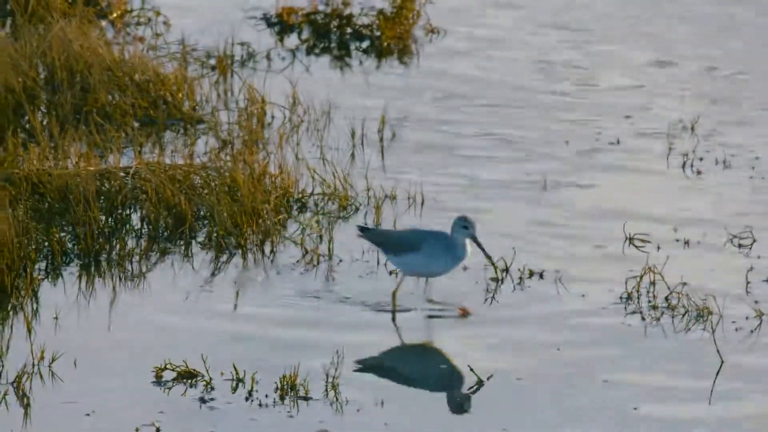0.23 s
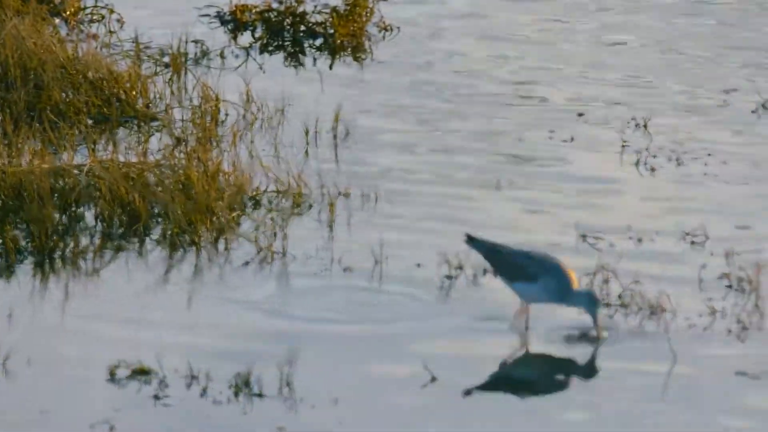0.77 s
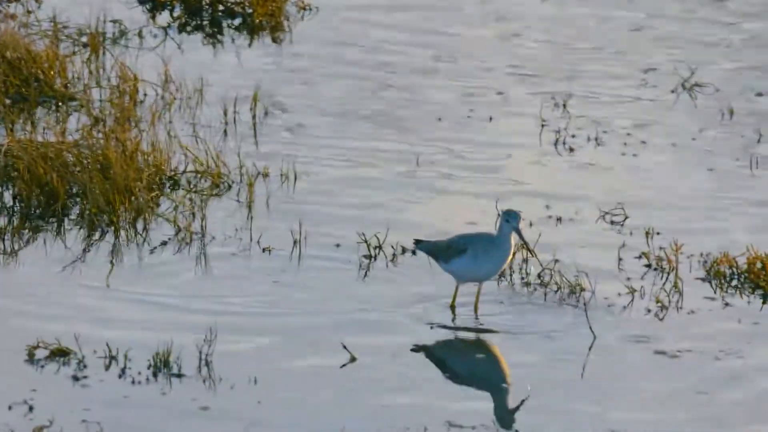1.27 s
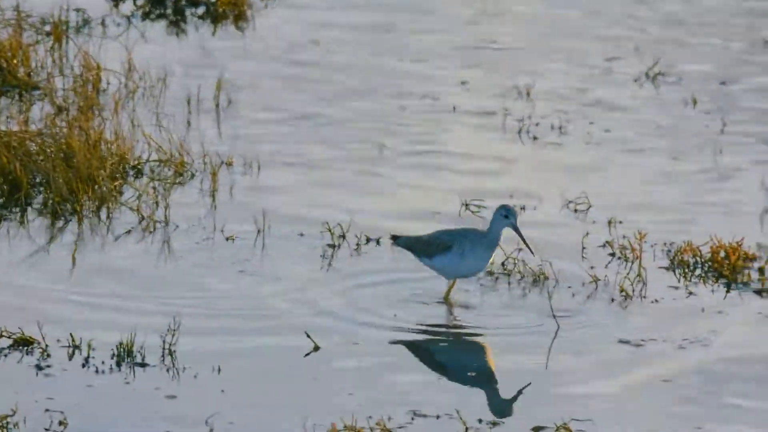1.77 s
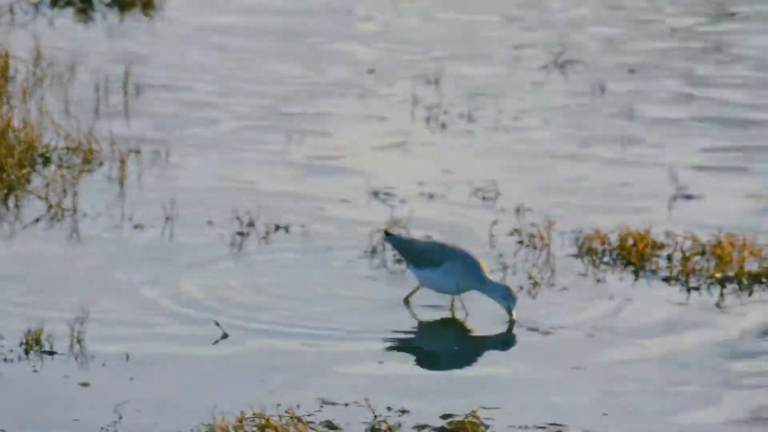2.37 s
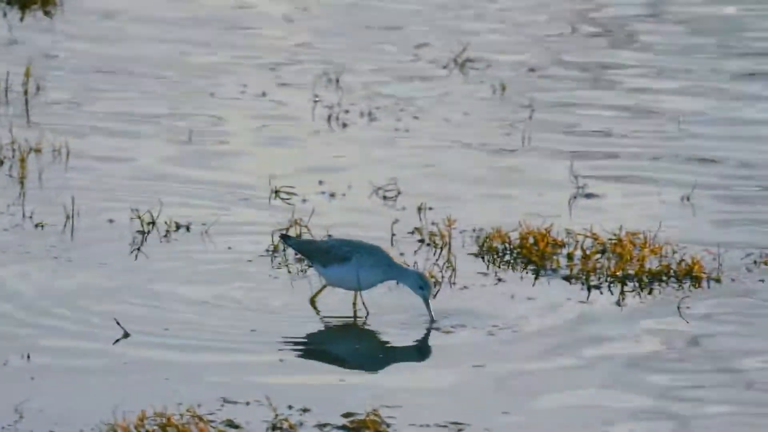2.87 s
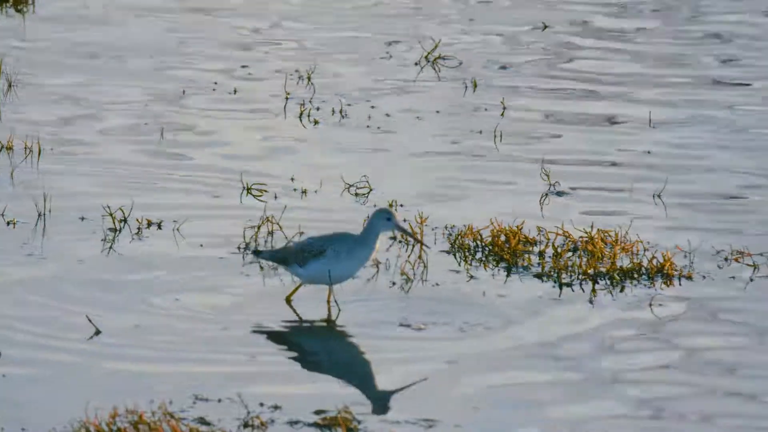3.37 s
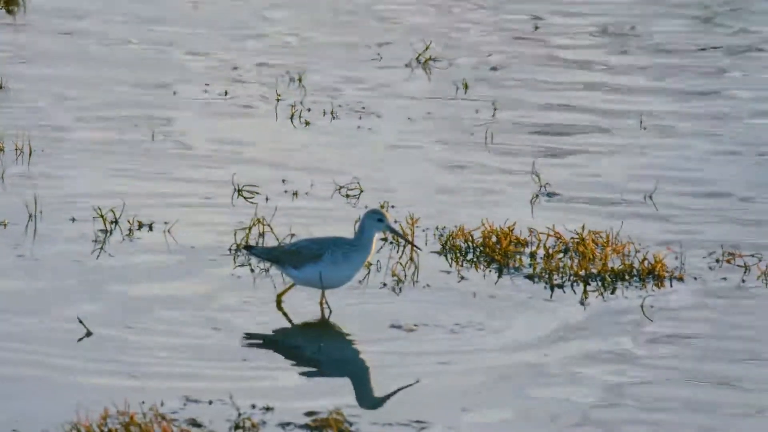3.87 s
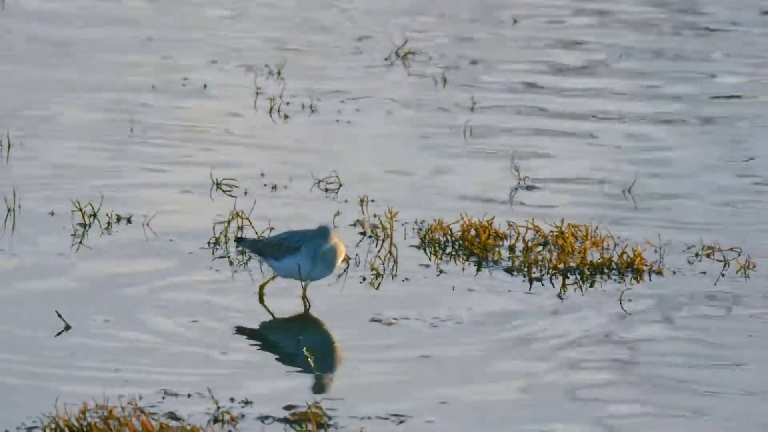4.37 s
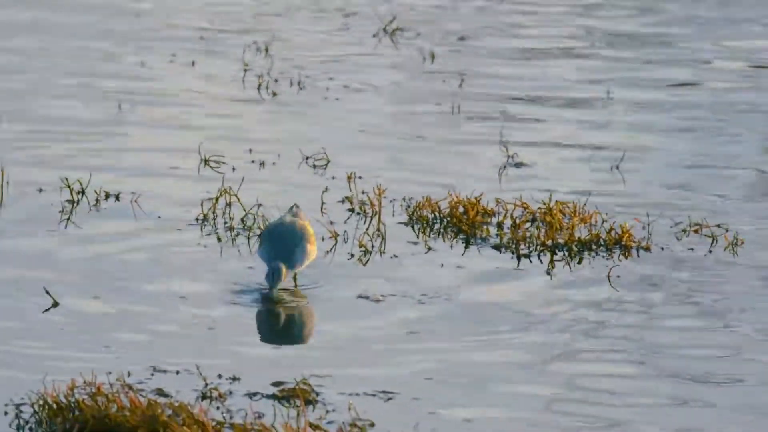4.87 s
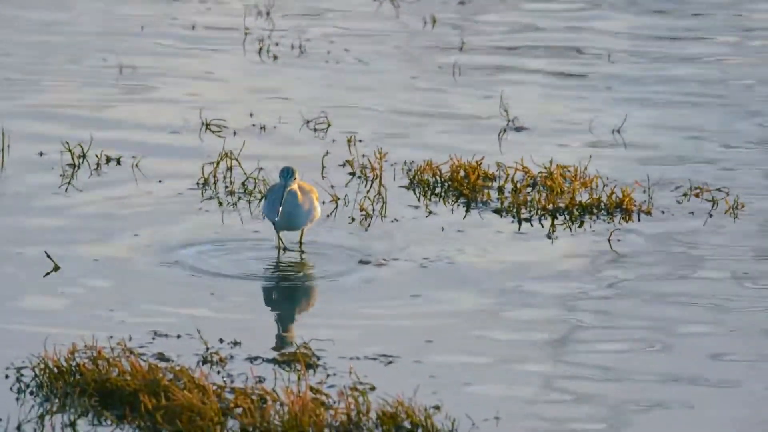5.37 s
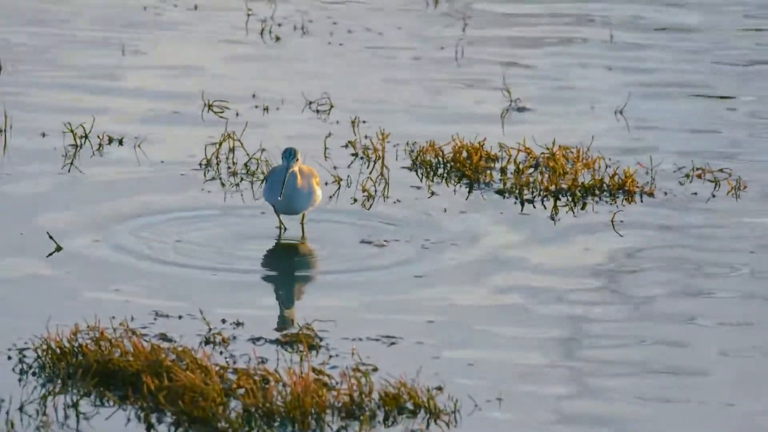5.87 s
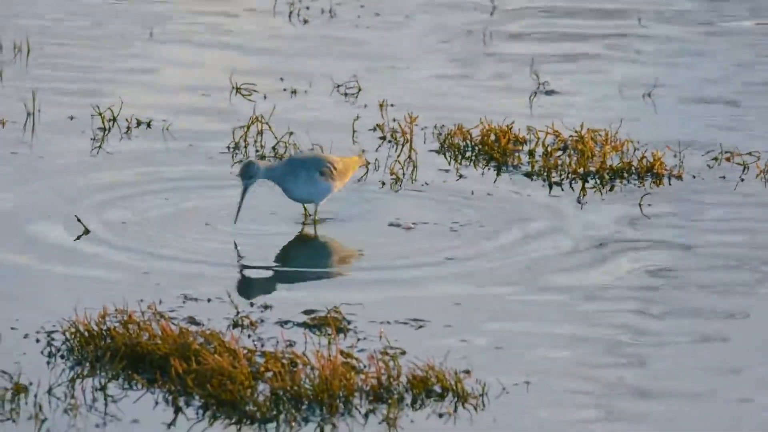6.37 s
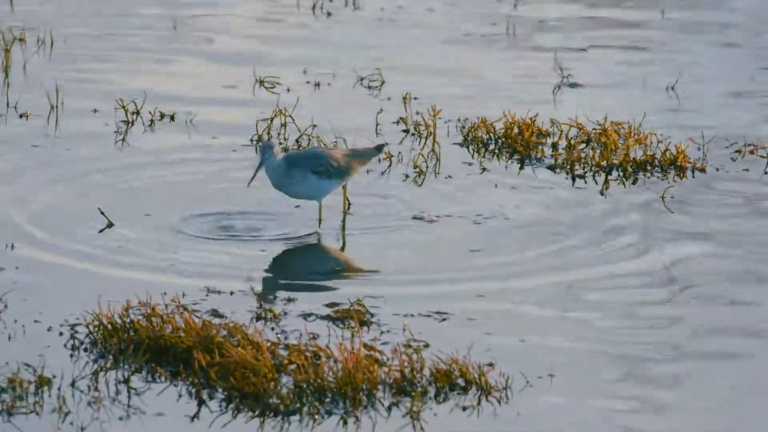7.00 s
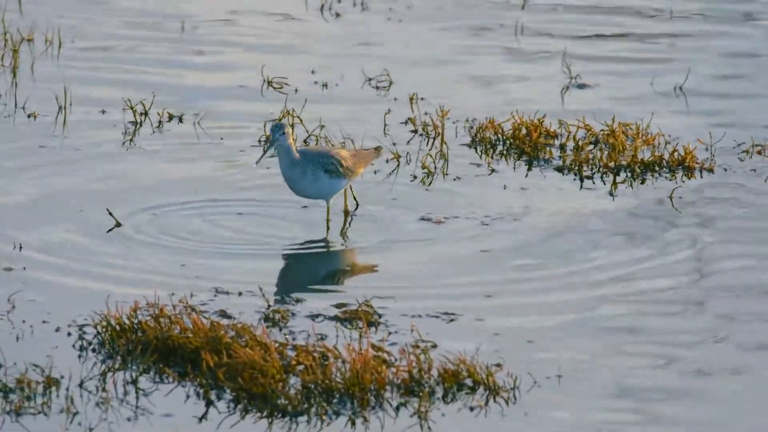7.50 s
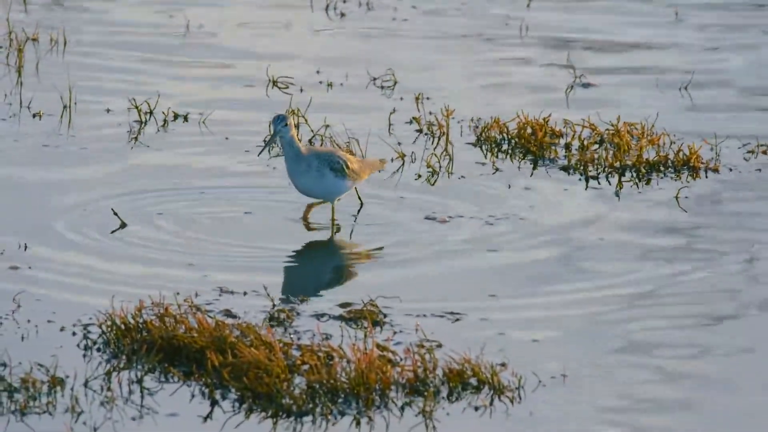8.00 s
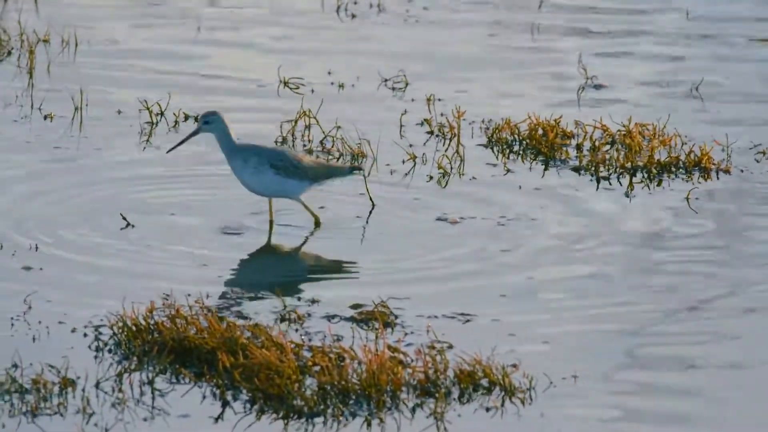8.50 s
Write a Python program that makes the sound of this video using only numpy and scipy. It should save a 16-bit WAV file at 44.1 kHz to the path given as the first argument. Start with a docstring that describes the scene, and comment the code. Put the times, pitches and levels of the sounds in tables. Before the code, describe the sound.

Gusty wind rumbles on the microphone over a marsh, with faint shorebird whistles, distant traffic and thin hiss.

```python
"""Gusty tidal marsh

Gusts rumble and flutter on the microphone over a bed of distant traffic, engine hum and thin hiss.
A far shorebird gives four runs of falling whistles and smaller birds peep, with a faint tail off the
reeds and banks. The shallows splash softly twice early on; the traffic and hiss swell near the end."""
import sys
import numpy as np
from scipy import signal
from scipy.fft import rfft, irfft, next_fast_len
from scipy.io import wavfile
from scipy.ndimage import uniform_filter1d, map_coordinates

SR = 44100
rng = np.random.default_rng(int(sys.argv[2]) if len(sys.argv) > 2 else 0)


def waveform_to_disk(signal):
    """Save audio, clipped to [-1, 1], as 16-bit WAV at the path in sys.argv[1]."""
    frames = np.transpose(np.atleast_2d(signal))
    scaled = np.clip(frames, -1, 1) * 32767
    samples = np.round(scaled).astype(np.int16)
    wavfile.write(sys.argv[1], SR, samples)


N = 385598

# The ride of the gusts. Each row: time in seconds, wind strength in dB against its average.
GUSTS = [(0, -0.5), (.15, 5), (.4, -7), (.95, -3), (1.2, 0), (1.85, 1), (2.1, -3.5), (2.4, -2.5), (2.9, 2),
         (3.8, 5.5), (4.4, -4), (5.5, -1), (5.8, 5.5), (6.62, 1), (6.8, -5), (7.1, -5), (7.4, 2), (8.05, 4),
         (8.3, -0.5), (8.74, -3)]
# The small eddies in an average wind. Each row: time in seconds, level in dB.
FLUTTER_LEVEL = [(0, -44), (1.8, -46), (5.2, -45.5), (8.74, -47.5)]
# Tone curves for the noise layers. Each row: frequency in Hz, relative level in dB.
RUMBLE_EQ = [(3, -8.5), (12, 8), (24, 1.5), (34, -3.5), (50, -10.5), (70, -18.5), (100, -38.5), (200, -76)]
FLUTTER_EQ = [(35, -37), (60, 3.5), (85, 1), (120, -6.5), (160, -12.5), (220, -24), (320, -29.5),
              (600, -50.5), (2000, -96)]
TYRE_EQ = [(150, -3.5), (260, -3.5), (370, -8), (435, -4), (490, -6.5), (570, -2), (625, -4), (690, 0.8),
           (840, -1.54), (970, -1.5), (1250, -7.5), (1600, -15), (2000, -21), (5000, -43)]
HISS_EQ = [(100, 0), (2000, 0.052), (4000, .4), (8000, 0.024), (15500, -0.33)]
SPRAY_EQ = [(1500, -30), (3000, -4), (5000, 0), (7000, -7), (12000, -20)]
# The late lift of the tyre wash, shared in part by the hiss. Each row: time in seconds, gain in dB.
LATE_SWELL = [(7.8, 0), (8.6, 4)]
# Narrow bands of engine drone and whine. Each row: centre in Hz, width in Hz, level in dB.
DRONE_BANDS = [(304.3, 9.6, -74.5), (688, 12, -84.5), (1475, 6, -88), (1690, 6, -88), (1910, 4.5, -91)]
# One far engine's hum drifting in and out. Each row: time in seconds, level in dB.
HUM_LEVEL = [(0, -74), (.4, -64.5), (.8, -73.5), (2.15, -74), (2.6, -64), (3, -75), (5.9, -72.5),
             (6.3, -63.5), (6.8, -71.5), (7.6, -65.5), (8.74, -71)]
# The shorebird's whistles. Each row: start in seconds, length in seconds, pitch it falls toward in Hz,
# middle of the slide as a share of the note, level in dB.
SHOREBIRD_NOTES = [ (.1, .04, 2760, .4, -79), (1.23, .05, 2590, .5, -74), (1.395, .065, 2550, .5, -79),
                   (1.545, .07, 2680, .6, -77), (1.72, .06, 2700, .5, -78), (1.9, .055, 2630, .25, -74),
                   (2.075, 0.048, 2630, 0.3, -73.5), (2.265, 0.05, 2540, .5, -70),
                   (2.445, .068, 2510, .45, -71), (2.628, 0.078, 2490, 0.6, -68.5),
                   (2.838, 0.067, 2480, 0.47, -72.5), (3.04, .078, 2510, .55, -76),
                   (3.897, 0.058, 2640, .6, -68.5), (4.027, .06, 2670, 0.25, -67),
                   (4.165, 0.076, 2650, 0.5, -66), (4.333, .085, 2560, .35, -69),
                   (5.795, .046, 2790, .6, -75), (5.935, .068, 2670, 0.5, -69),
                   (6.125, 0.074, 2550, .35, -68.5), (6.29, 0.08, 2500, 0.34, -69),
                   (6.445, .052, 2620, .5, -74.5), (7.412, 0.069, 2610, 0.65, -67),
                   (7.562, 0.079, 2500, .5, -67), (7.724, .072, 2480, .4, -68.5)]
# Small birds' peeps. Each row: start in seconds, length in seconds, low pitch in Hz, level in dB.
PEEP_NOTES = [ (2.327, .03, 3770, -70), (2.417, .075, 3560, -77), (4.075, .03, 3370, -78),
              (4.225, .035, 3370, -75), (5.07, .025, 3410, -74), (6.1, .025, 3680, -73),
              (6.625, .03, 3550, -76)]
# Splashes in the shallows. Each row: peak time in seconds, half-width in seconds, peak level in dB.
SPLASH_CUES = [(.69, .016, -66), (.95, 0.01, -65)]

RUMBLE_DB, TRAFFIC_DB, HISS_DB = -29, -54.5, -61.5  # before gusts and swell
WHISTLE_TOP_HZ, PEEP_FALL_HZ = 2940, 100
TOP_HZ = 15800


def amp(db):
    """Decibels to gain."""
    return 10 ** (np.asarray(db) / 20)


def unit(x):
    """x at rms 1."""
    return x / np.sqrt(np.mean(x ** 2) + 1e-20)


def ride(rows):
    """A fader move through (seconds, value) points, one value per sample."""
    times, values = np.transpose(rows)
    return np.interp(np.arange(N) / SR, times, values)


def wobble(rate):
    """A smooth random curve, rate knots a second."""
    knots = rng.standard_normal(int(N * rate / SR) + 4)
    return map_coordinates(knots, [np.arange(N) * rate / SR])


def filtered(x, response):
    """x through a filter whose gain is response(hz)."""
    size = next_fast_len(N + SR // 2)
    return irfft(rfft(x, size) * response(np.fft.rfftfreq(size, 1 / SR)), size)[:N]


def coloured(x, eq):
    """x shaped by (Hz, dB) points on a log axis, at rms 1."""
    points_hz, db = np.transpose(eq)
    return unit(filtered(x, lambda hz: amp(np.interp(np.log(hz + 1), np.log(points_hz + 1), db))))


def white():
    """Fresh white noise."""
    return rng.standard_normal(N)


def patchy(depth_db):
    """Noise whose bands swell and fade on their own."""
    bands = signal.stft(white(), nperseg=1024)[2]
    patches = uniform_filter1d(rng.standard_normal(bands.shape), size=5, axis=0)  # across frequency
    patches = uniform_filter1d(patches, size=20, axis=1)  # across time
    return signal.istft(bands * amp(depth_db * unit(patches)), nperseg=1024)[1][:N]


def eddies(eq, span_s):
    """Turbulent pressure, levelled so its strength is even over span_s."""
    pressure = coloured(white(), eq)
    power = np.abs(uniform_filter1d(pressure ** 2, int(span_s * SR) + 1))
    return unit(pressure / np.sqrt(power + 1e-6))


def wind():
    """Gusts drive big eddies that rumble and small ones that flutter on their pressure peaks."""
    gust_db = ride(GUSTS)
    big = eddies(RUMBLE_EQ, span_s=0.199)
    small = unit(eddies(FLUTTER_EQ, span_s=0.16) * amp(2.5 * np.abs(big)))
    # The rumble leans harder into each gust; both get quick random buffets.
    rumble = amp(RUMBLE_DB + 1.04 * gust_db + 1.5 * wobble(11)) * big
    flutter = amp(ride(FLUTTER_LEVEL) + 0.77 * gust_db + 1.52 * wobble(12)) * small
    return rumble + flutter


def traffic():
    """Tyre wash from a far road, dulled by the air, with engine drones that swell and fade."""
    wash_db = TRAFFIC_DB + ride(LATE_SWELL) + 0.25 * wobble(5)
    bed = amp(wash_db) * coloured(patchy(depth_db=1.24), TYRE_EQ)
    for centre, width, db in DRONE_BANDS:
        drone = filtered(white(), lambda hz: 1 / (1 + (2 * (hz - centre) / width) ** 2))
        bed += amp(db + 2.2 * wobble(1.515)) * unit(drone)
    return bed


def engine(hum_hz, drift_hz):
    """A far engine's firing tone, wandering a little in pitch and strength over the water."""
    phase = 2 * np.pi * np.cumsum(hum_hz + drift_hz * wobble(5)) / SR
    return amp(ride(HUM_LEVEL) + 0.82 * wobble(8)) * np.sqrt(2) * np.sin(phase)


def hiss(swell_share):
    """The microphone's smooth, white self-noise, lifted by a share of the late swell."""
    return amp(HISS_DB + swell_share * ride(LATE_SWELL)) * coloured(white(), HISS_EQ)


def bird_notes(rows, swell, waver):
    """Pure whistles that hold, slide to a second pitch and level off, loudest late in the note."""
    track = np.zeros(N + SR)
    unsteady = 1 + waver * wobble(90)
    for start, length, start_hz, end_hz, middle, db in rows:
        progress = np.linspace(0, 1, int(length * SR))
        at = round(start * SR)
        span = slice(at, at + len(progress))
        slide = (1 + np.tanh((progress - middle) / 0.308)) / 2  # takes about 60% of the note
        pitch = (start_hz + (end_hz - start_hz) * slide) * unsteady[span]
        envelope = unit(np.abs(np.sin(np.pi * progress)) ** 0.34 * np.exp(swell * progress))
        tone = np.sqrt(2) * np.sin(2 * np.pi * np.cumsum(pitch) / SR)
        track[span] += amp(db) * envelope * tone
    return track[:N]


def birds():
    """Far calls flickering through moving air: whistles fall from one top pitch, peeps barely drop."""
    whistle_rows = [(start, length, WHISTLE_TOP_HZ, *rest) for start, length, *rest in SHOREBIRD_NOTES]
    peep_rows = [(start, length, hz + PEEP_FALL_HZ, hz, 0.5, db) for start, length, hz, db in PEEP_NOTES]
    whistles = bird_notes(whistle_rows, swell=1.15, waver=0.0071)
    peeps = bird_notes(peep_rows, swell=0.2, waver=0.0087)
    flicker = amp(1.5 * wobble(70))
    return shore_echo((whistles + peeps) * flicker, t60=0.32, echo_db=-12)


def shore_echo(x, t60, echo_db):
    """x with a faint tail scattered back by reeds and banks."""
    t = np.arange(SR // 2) / SR
    tail = rng.standard_normal(len(t)) * amp(-60 * t / t60)
    return x + amp(echo_db) * signal.fftconvolve(x, tail / np.linalg.norm(tail))[:N]


def splashes():
    """Brief, grainy puffs of fine droplets in the shallows."""
    t = np.arange(N) / SR
    envelope = sum(amp(db) * np.exp(-((t - peak) / width) ** 2) for peak, width, db in SPLASH_CUES)
    droplets = unit(coloured(white(), SPRAY_EQ) * amp(3 * wobble(400)))
    return envelope * droplets


def scene():
    """The mono mix: wind up front, everything else far behind."""
    bed = wind() + traffic() + engine(hum_hz=319.8, drift_hz=1.79)
    return (bed + birds() + splashes() + hiss(swell_share=0.57))[None]


def record(dry):
    """A brick-wall low-pass trims the very top of the mix."""
    return filtered(dry[0], lambda hz: hz < TOP_HZ)[None]


dry = scene()
out = record(dry)
waveform_to_disk(out)
```